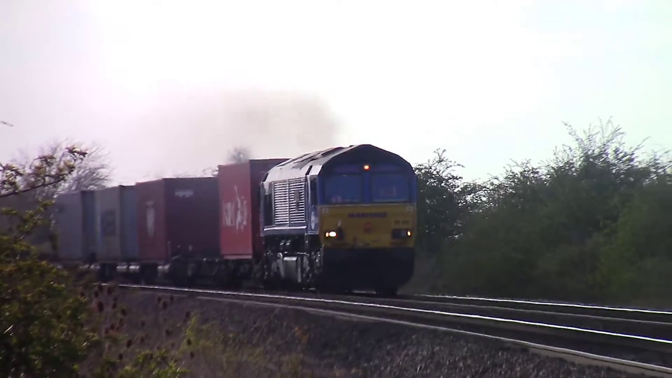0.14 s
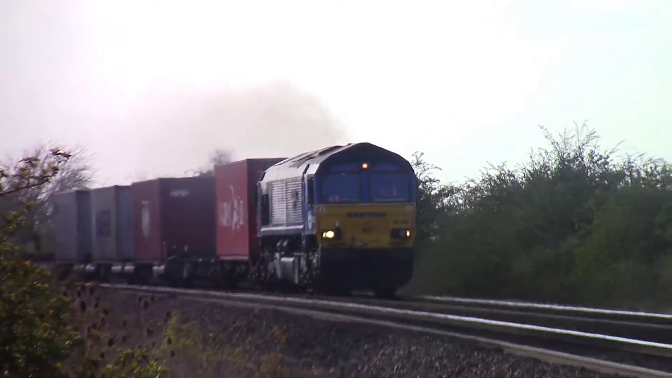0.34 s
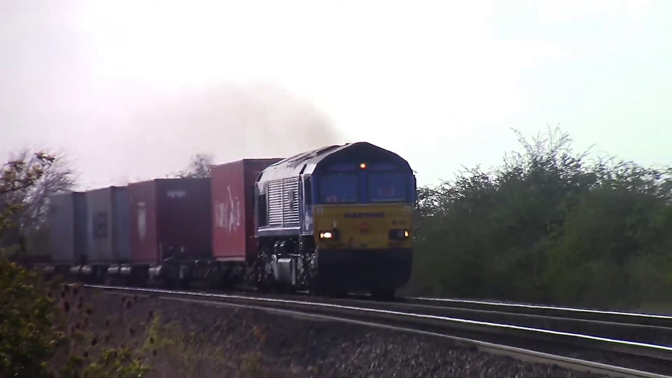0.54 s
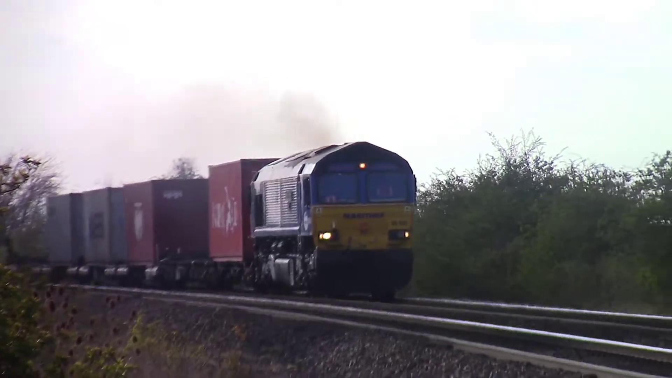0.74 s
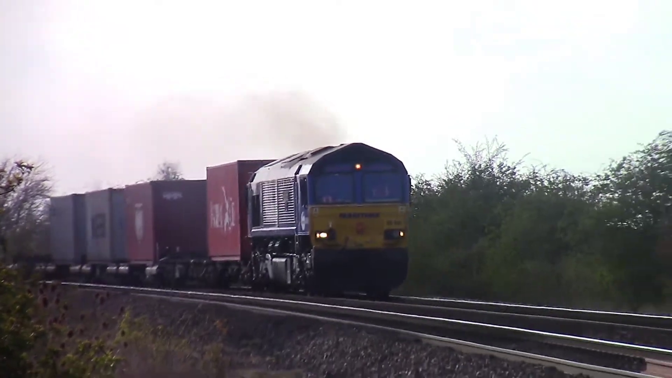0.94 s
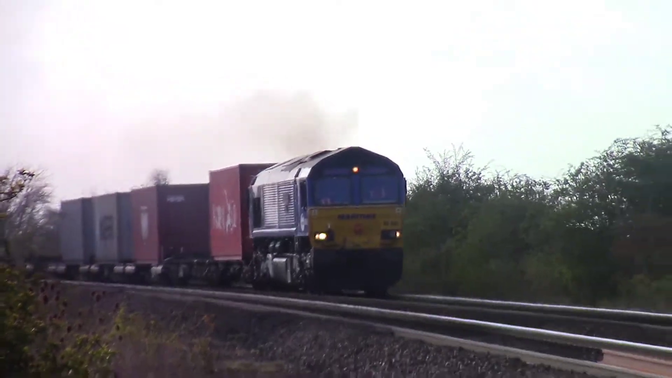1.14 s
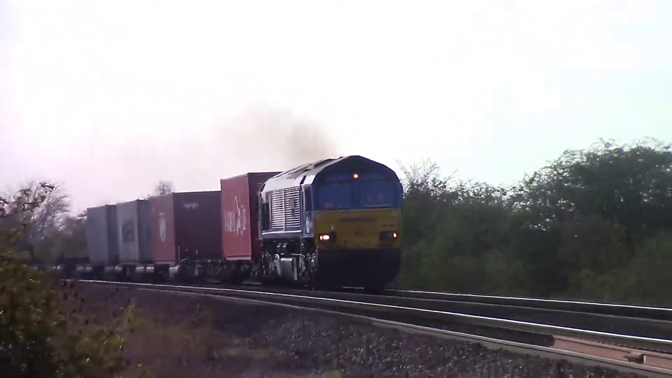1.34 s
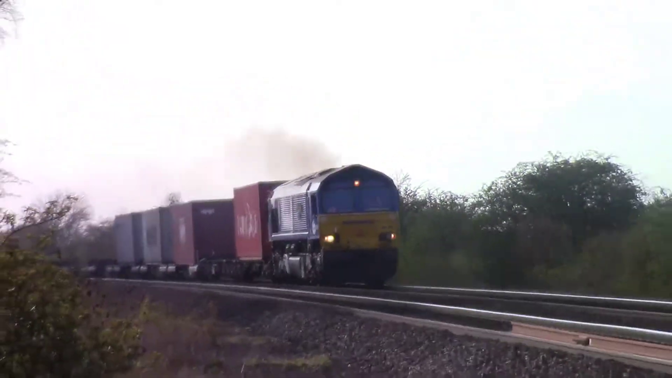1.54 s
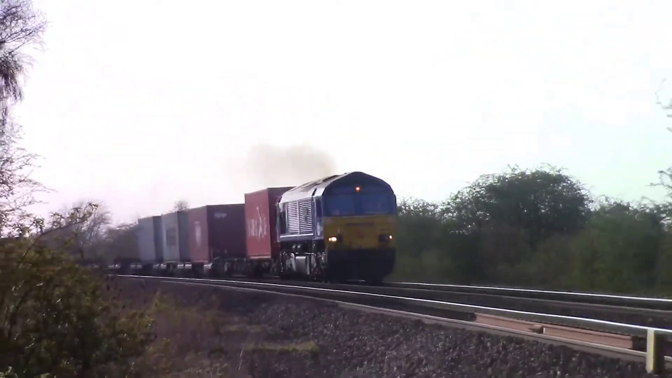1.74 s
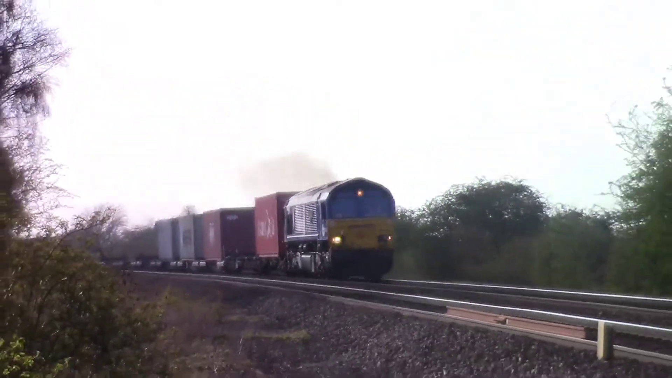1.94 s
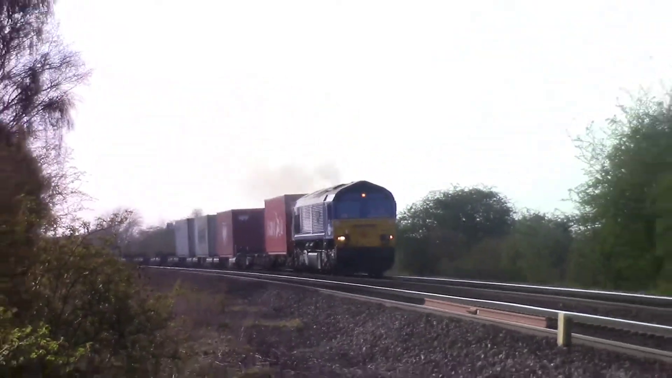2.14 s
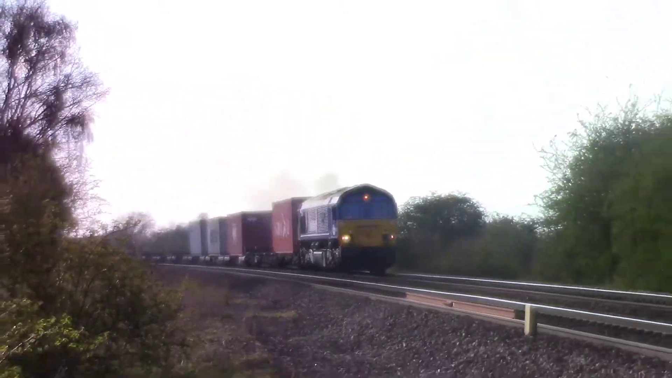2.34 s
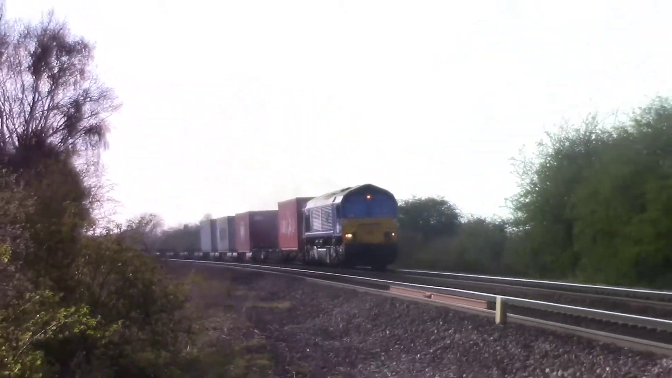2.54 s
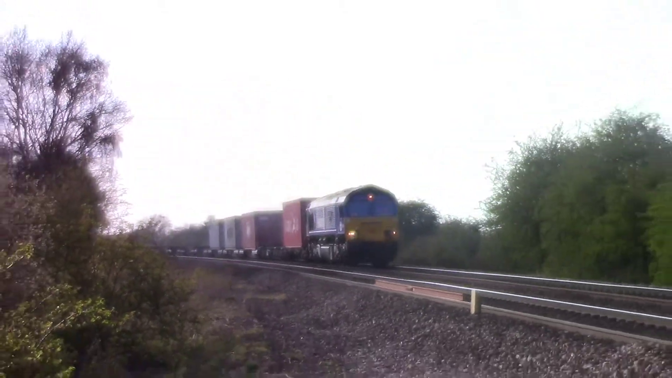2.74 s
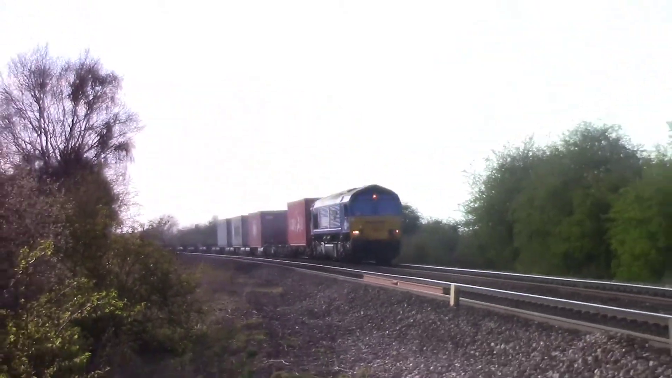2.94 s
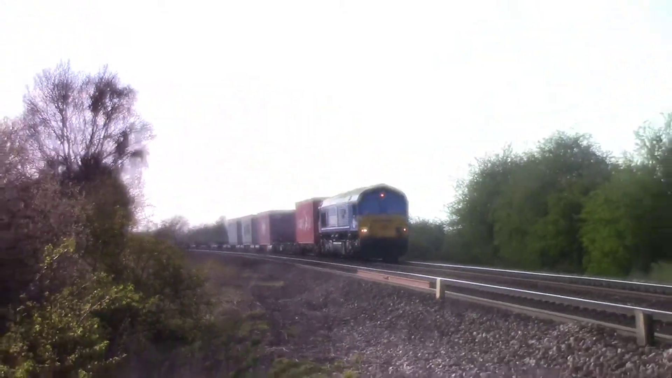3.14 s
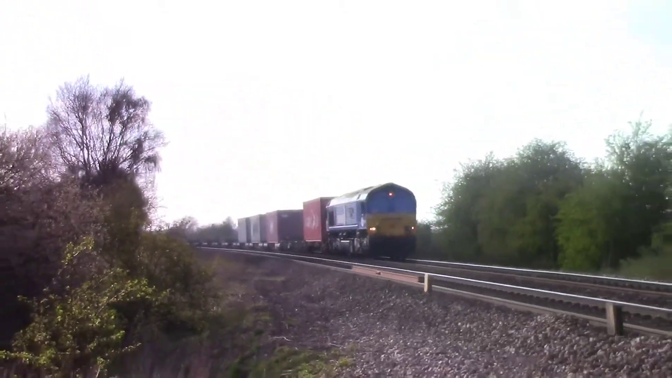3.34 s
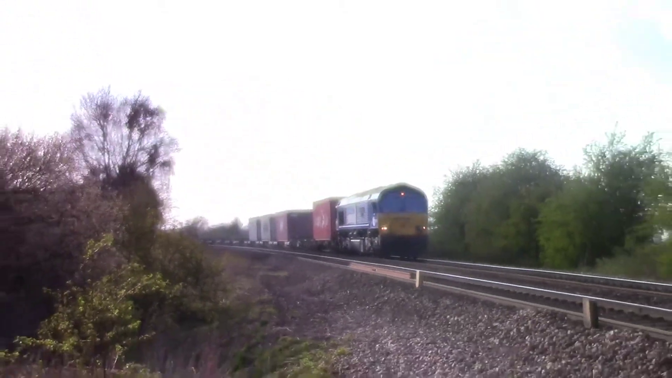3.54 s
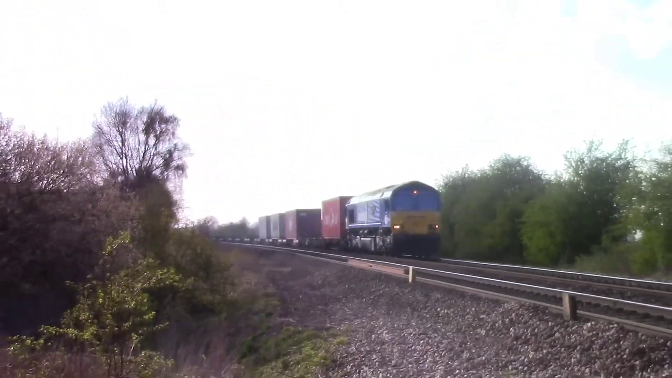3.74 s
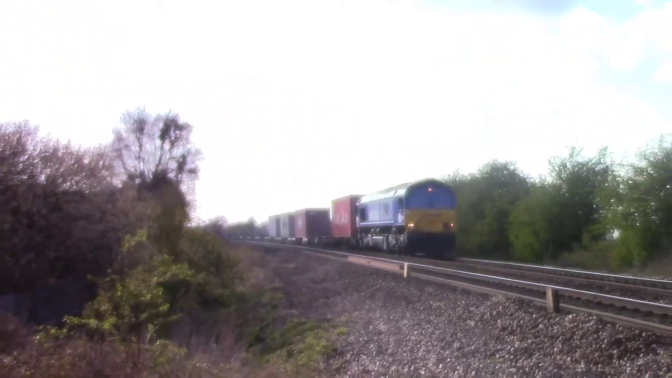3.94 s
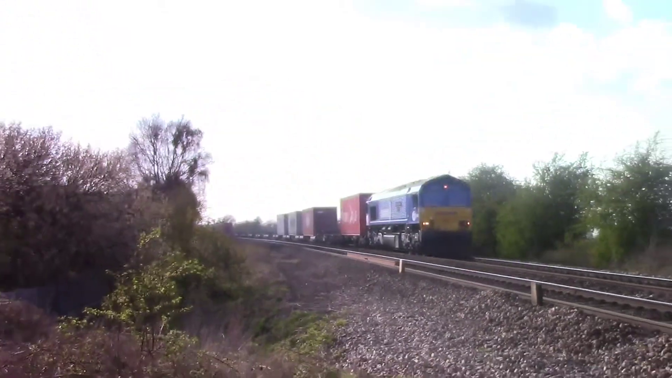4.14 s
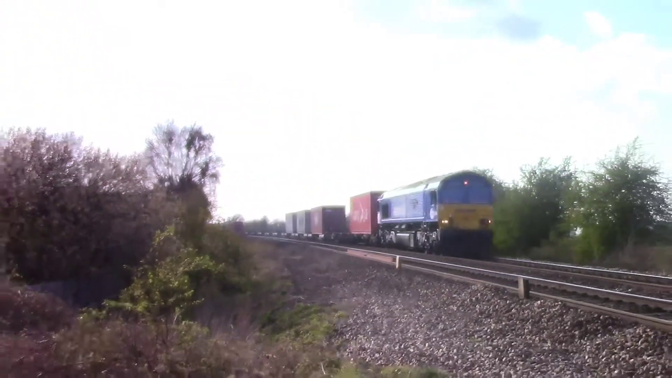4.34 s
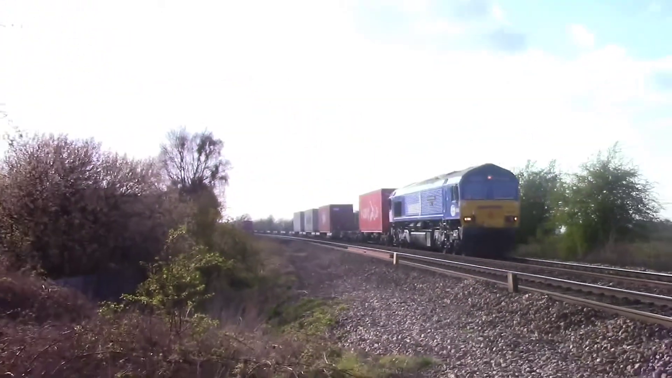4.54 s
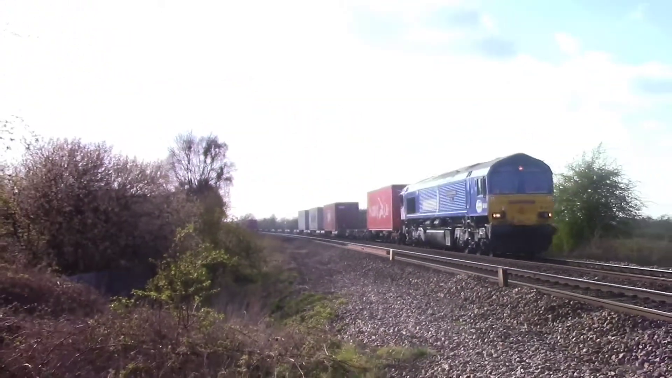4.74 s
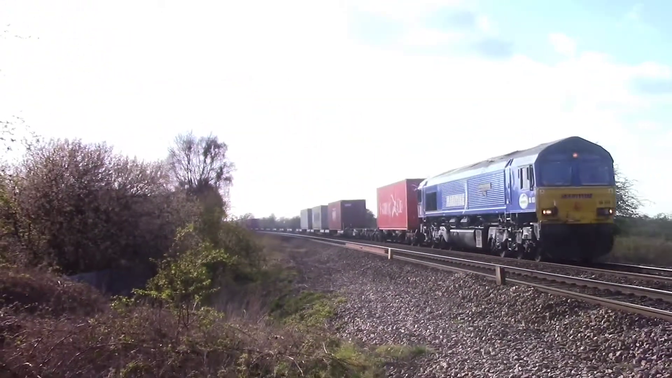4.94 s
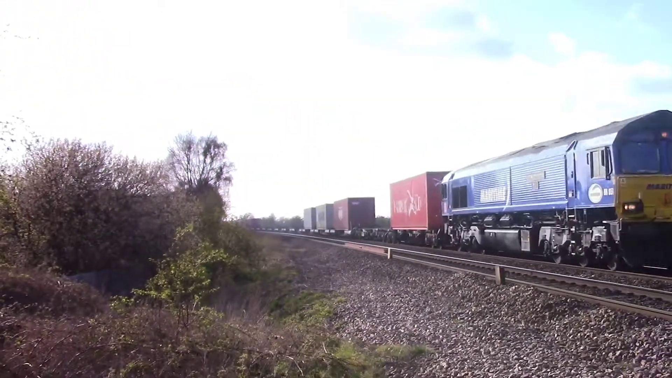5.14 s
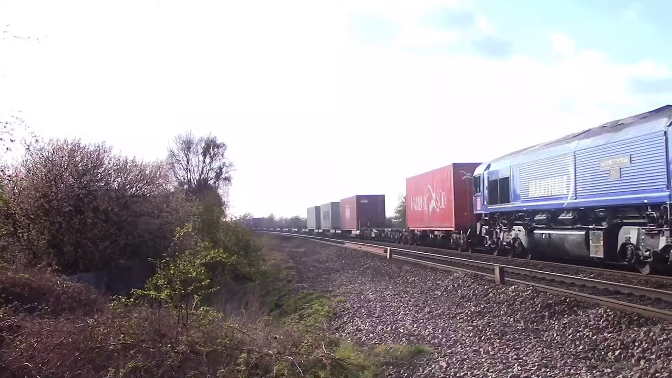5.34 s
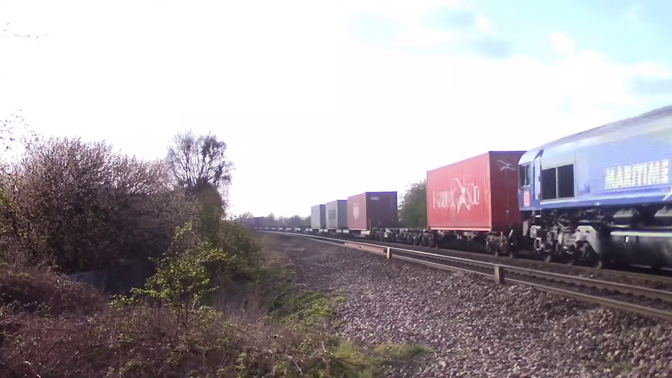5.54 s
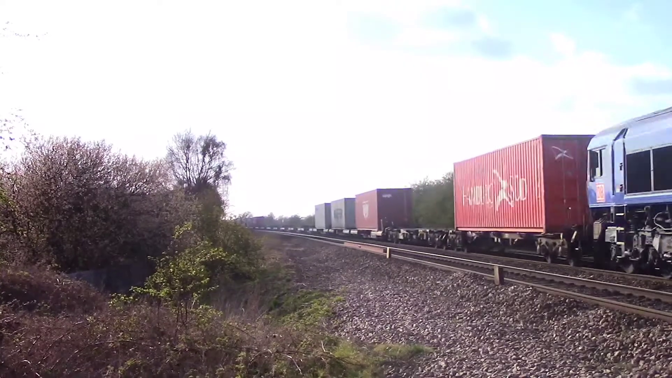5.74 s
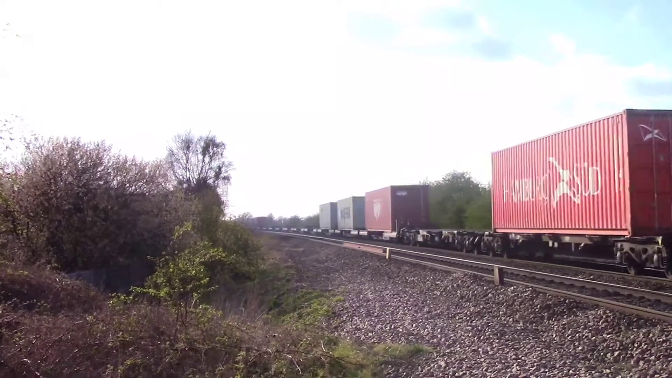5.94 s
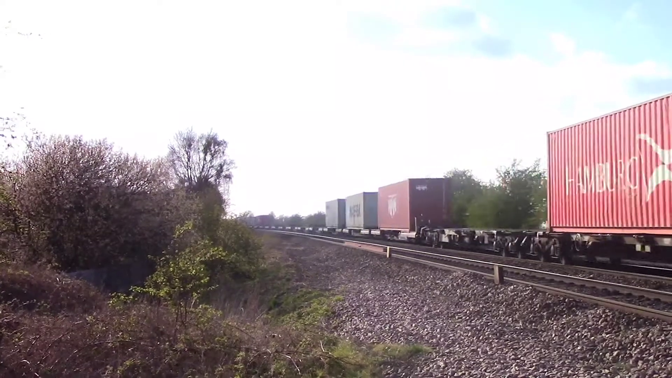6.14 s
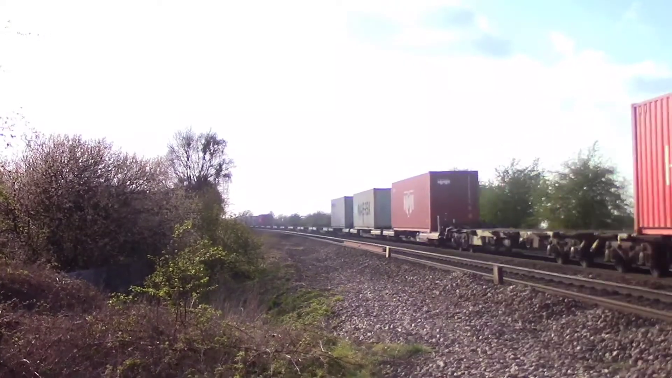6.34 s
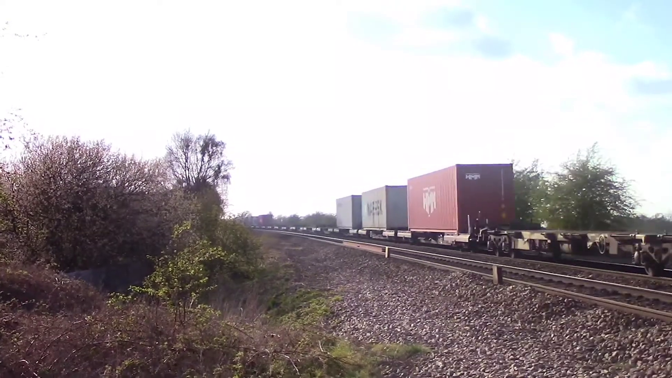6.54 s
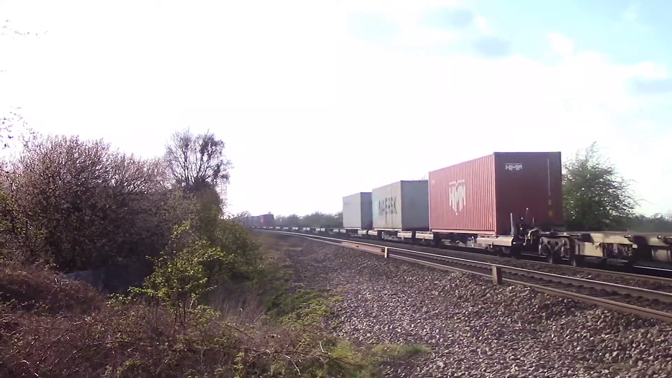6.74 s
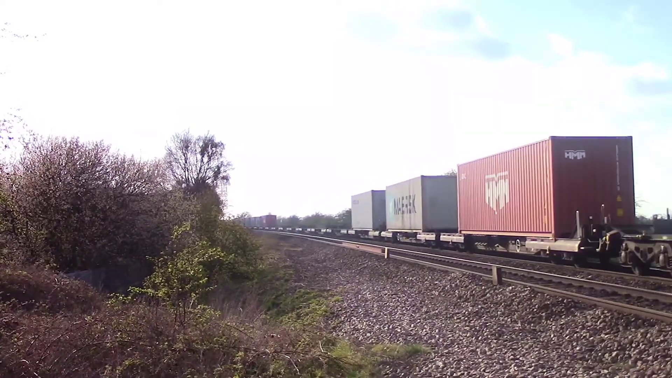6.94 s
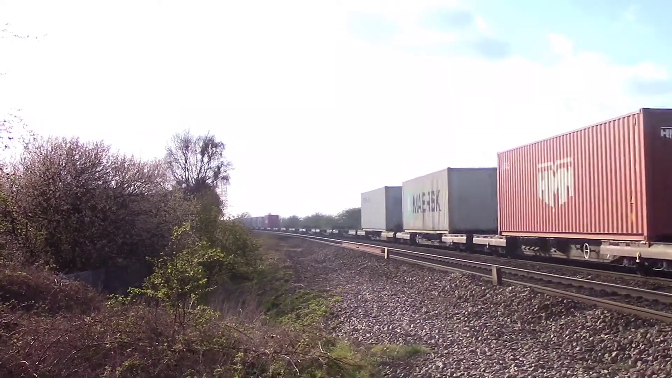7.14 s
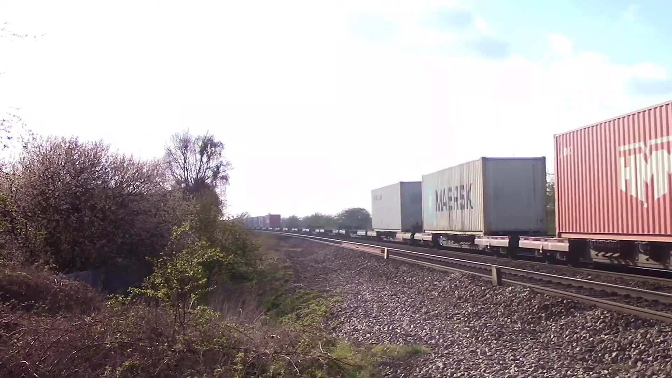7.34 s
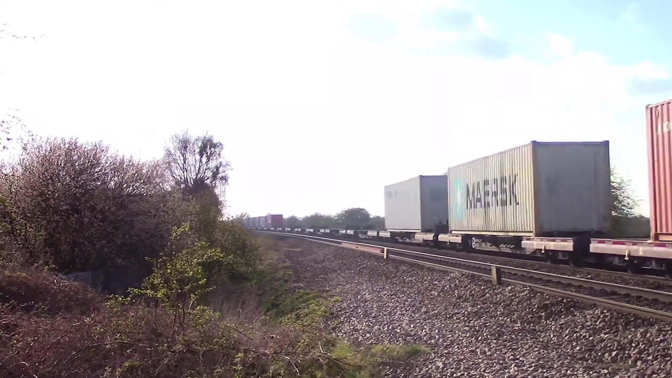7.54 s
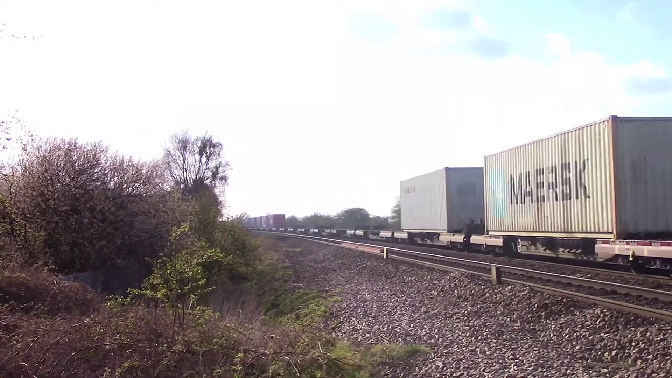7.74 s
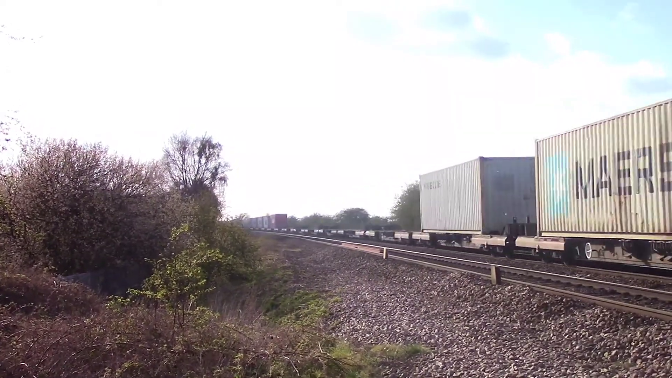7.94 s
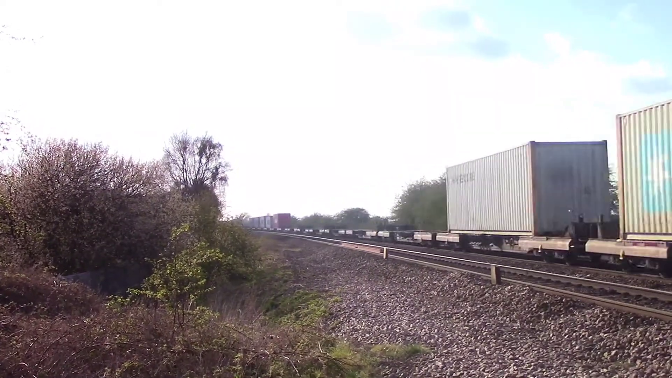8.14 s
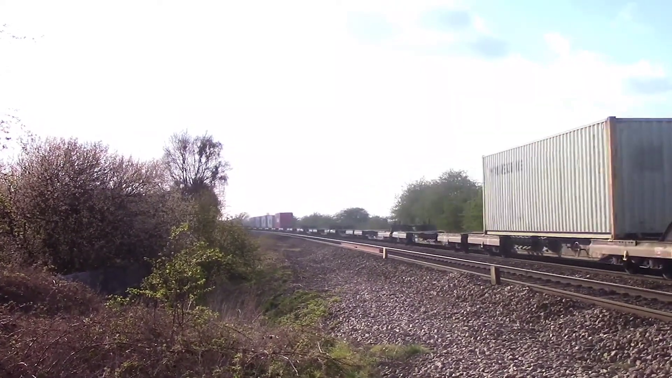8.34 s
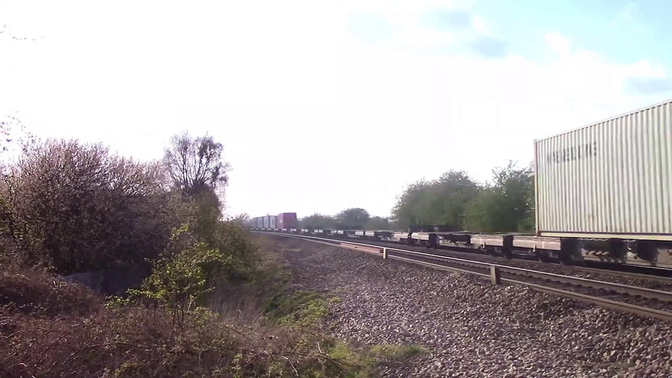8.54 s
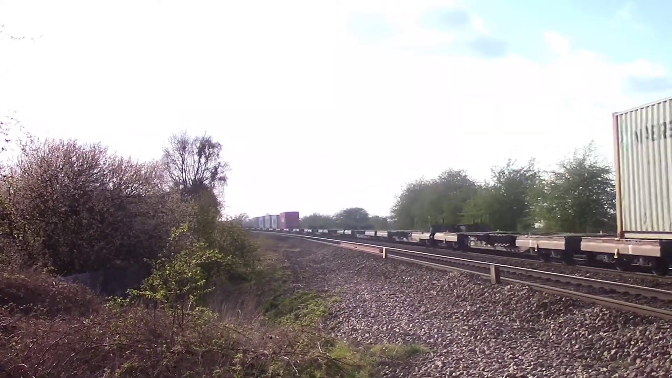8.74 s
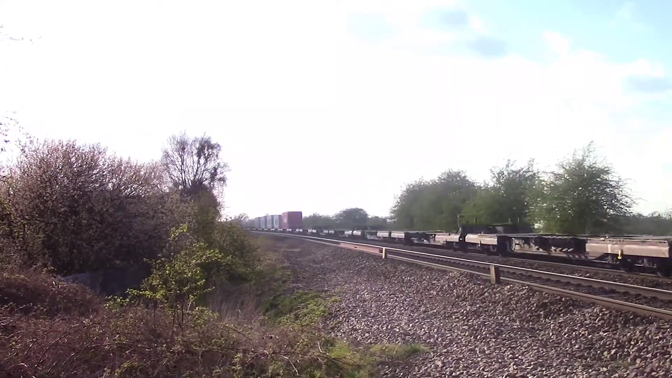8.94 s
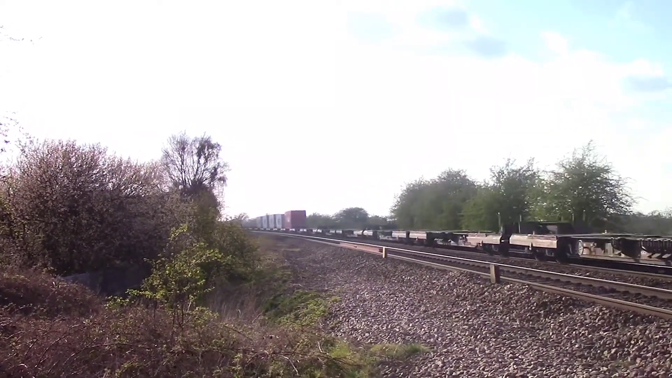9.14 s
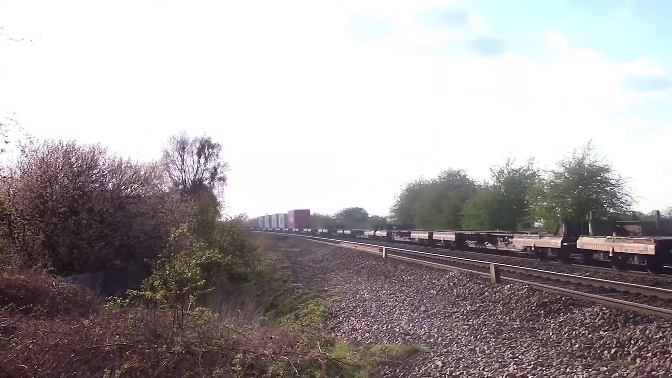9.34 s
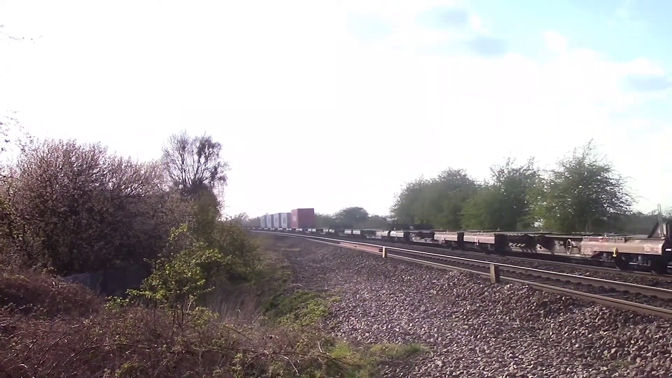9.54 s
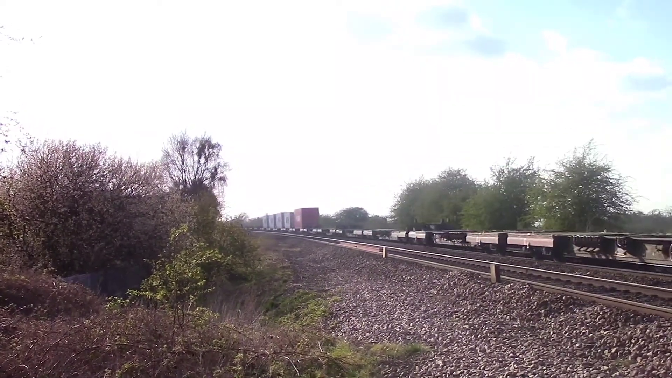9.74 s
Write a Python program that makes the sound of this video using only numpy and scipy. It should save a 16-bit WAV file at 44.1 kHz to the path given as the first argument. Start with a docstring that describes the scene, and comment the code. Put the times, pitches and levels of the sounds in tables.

```python
"""A diesel freight train passes at speed a few metres from a pair of microphones.
The engine drones in harmonics of its crankshaft rate and the locomotive's wheels sing as resonant modes,
dropping in pitch by the Doppler effect as each bogie goes by. Loaded, then empty container wagons roar past as
filtered noise that throbs with wheel turns and sleepers, amid squeals, knocks and booms.
A small bird trills in swept sine tones while the train is far off, over faint air noise with a thin whine."""
import sys
import numpy as np
from scipy import signal
from scipy.fft import rfft, irfft
from scipy.io import wavfile
from scipy.ndimage import uniform_filter1d, minimum_filter1d

SR = 44100
rng = np.random.default_rng(int(sys.argv[2]) if len(sys.argv) > 2 else 0)


def waveform_to_disk(signal):
    """Save audio, clipped to [-1, 1], as 16-bit WAV at the path in sys.argv[1]."""
    frames = np.transpose(np.atleast_2d(signal))
    scaled = np.clip(frames, -1, 1) * 32767
    samples = np.round(scaled).astype(np.int16)
    wavfile.write(sys.argv[1], SR, samples)


N = 436590
T = np.arange(N) / SR  # seconds
HZ = np.maximum(np.arange(N // 2 + 1) * SR / N, 1)  # spectrum bins

SPEED, TRACK_M, SOUND_SPEED = 30.0, 9.0, 343.0  # m/s, m, m/s
WHEEL_TURN_HZ, SLEEPER_HZ = 11.7, 43.14
CAB_ABREAST_S = 5.304


def undb(db):
    """Amplitude ratio: 20 dB is a factor of ten."""
    return 10 ** (np.asarray(db) / 20)


def unit(x):
    """Normalisation: scale to rms 1."""
    return x / np.sqrt(np.mean(np.abs(x) ** 2))


def contour(points):
    """Spectral envelope: (Hz, value) points joined on a log-frequency axis."""
    hz, value = np.transpose(points)
    return np.interp(np.log(HZ), np.log(hz), value)


def walk(rate):
    """Low-pass random modulation: a smooth wander with spread near 1, renewed `rate` times a second."""
    k = max(int(SR / rate), 2)
    steps = np.repeat(rng.standard_normal(N // k + 1), k)
    return 1.2 * uniform_filter1d(steps, k)[:N]


def swell(s, length):
    """Gaussian envelope: a bell-shaped rise and fall around a moment."""
    return np.exp(-.5 * ((T - s) / length) ** 2)


def after(s):
    """Elapsed time: seconds gone by since a moment, 0 before it."""
    return np.maximum(T - s, 0)


def ramp(start_s, length_s):
    """Linear crossfade: 0 before the start, 1 once the length has passed."""
    return np.clip((T - start_s) / length_s, 0, 1)


def throb(hz, wander):
    """Amplitude modulation: a swell once a cycle; the axles in earshot drift in and out of step."""
    return np.sqrt(2) * np.cos(2 * np.pi * np.cumsum(hz * (1 + wander * walk(5))) / SR)


def resonance(hz, width, steady=0.32):
    """Randomly driven mode: a wider one wanders faster in phase; friction evens out its size."""
    slow = np.arange(0, N, 16)  # the swing is computed at every 16th sample
    pole = np.exp(-np.pi * width * 1.5 * slow[1] / SR)
    push = rng.standard_normal(len(slow)) + 1j * rng.standard_normal(len(slow))
    swing = signal.lfilter([1], [1, -2 * pole, pole ** 2], push)
    swing = unit(swing / np.abs(swing) ** min(steady, 1))
    in_phase = np.interp(T, slow / SR, swing.real)
    quadrature = np.interp(T, slow / SR, swing.imag)
    phase = 2 * np.pi * np.cumsum(hz * np.ones(N)) / SR
    return np.sqrt(2) * (in_phase * np.cos(phase) + quadrature * np.sin(phase))


def passing(pass_s):
    """Doppler effect: pitch factor and nearness (1 when abreast) of a point on the train."""
    along = SPEED * (T - pass_s)
    distance = np.hypot(along, TRACK_M)
    return 1 / (1 + SPEED / SOUND_SPEED * along / distance), TRACK_M / distance


def approach(level_s, doubling_db, db_per_m):
    """Spreading and ground loss: dB of an oncoming source, rising to 0 as it draws level."""
    distance = np.hypot(SPEED * np.maximum(level_s - T, 0), TRACK_M)
    return -doubling_db * np.log2(distance / TRACK_M) - db_per_m * (distance - TRACK_M)


# Level difference, left minus right, of a source abreast.
# Each row: frequency in Hz, difference in dB.
MIC_BALANCE = [(300, 0), (900, -.7), (2200, -1.4), (4000, -2.5), (6500, -4.8), (9500, -3), (13000, 0)]
# Phase lead of the left microphone for a source abreast. Each row: frequency in Hz, lead in radians.
MIC_PHASE = [(200, 0), (1300, -.18), (4000, -.12), (10000, 0)]


def abreast(x, start_s=5.1, end_s=5.561):
    """Shadowing: with the train to the right, the camera body shades the left capsule from its treble."""
    half = np.array([[.5], [-.5]])
    gain = undb(half * contour(MIC_BALANCE))
    turn = np.exp(1j * half * contour(MIC_PHASE))
    shaded = irfft(rfft(x) * gain * turn, N)
    return x + ramp(start_s, end_s - start_s) * (shaded - x)


# Colour of the steady background, with a peak for the whine. Each row: frequency in Hz, relative level in dB.
AIR = [(30, 12), (3000, 8.5), (6200, -14), (6550, 3), (6720, 16.5), (6950, 3), (7600, 1), (8500, -7),
       (12000, -6.5), (14300, 4), (15500, -4.5)]


def air(level_db=-60.5, side_share=0.68):
    """Stationary filtered noise: a faint background with a thin high whine, as mid and side."""
    noise = rfft(rng.standard_normal((2, N)))
    mid, side = unit(irfft(noise * undb(contour(AIR)), N)) * undb(level_db)
    return mid, side_share * side


# The bird's opening notes.
# Each row: start in seconds, length in seconds, start pitch in Hz, end pitch in Hz, level in dB.
BIRD_NOTES = [(.21, 0.04022, 5354, 5200, -65.5), (1.095, 0.02196, 5750, 5950, -61),
              (1.128, .022, 3950, 4700, -56.5), (1.243, .022, 4300, 5348, -56),
              (1.3, 0.01807, 3501, 3989, -56), (1.447, 0.048, 5060, 5190, -55.5),
              (1.5, .03, 5150, 5200, -63), (1.6, 0.024, 3500, 4650, -53), (1.625, 0.024, 4900, 6104, -50)]
TRILL_S, TRILL_STEP_S, TRILL_DB = 1.68, .0637, -50


def bird(count=10, fade_db=.8, scatter_db=1.1, flatten_hz=18):
    """Frequency sweeps: slurred notes, then a trill of rises and steep falls that dies away."""
    notes = list(BIRD_NOTES)
    for k, (up, down) in enumerate(scatter_db * rng.standard_normal((count, 2))):
        s, db = TRILL_S + k * TRILL_STEP_S, TRILL_DB - fade_db * k
        notes.append((s, .017, 4550, 5300 - flatten_hz * k, db + up))
        notes.append((s + .015, .018, 4600, 3250, db + .3 + down))
    out = np.zeros(N)
    for s, length, start_hz, end_hz, db in notes:
        n, i = int(length * SR), int(s * SR)
        envelope = np.sin(np.linspace(0, np.pi, n))
        phase = 2 * np.pi * np.cumsum(np.linspace(start_hz, end_hz, n)) / SR
        out[i:i + n] += undb(db) * envelope * np.sin(phase)
    return out


# Brushes of wheel flanges against the rail. Each row: centre in seconds, half length in seconds, level in dB.
SCUFFS = [(9.3, .014, -35), (9.397, .014, -39), (9.458, 0.022, -39), (9.63, 0.02, -38.5),
          (9.685, 0.011, -37), (9.77, 0.014, -36), (9.87, .02, -38.5)]


def scuffs(lo_hz=5200, hi_hz=9300):
    """Sliding friction: flanges of the empty wagons brush the rail in short bursts of band-passed noise."""
    band = signal.butter(3, [lo_hz, hi_hz], "band", fs=SR, output="sos")
    hiss = unit(signal.sosfilt(band, rng.standard_normal(N)))
    return hiss * sum(undb(db) * swell(s, length) for s, length, db in SCUFFS)


# Blows of worn wheels on the rail.
# Each row: start in seconds, ring pitch in Hz, level in dB before the blow's envelope.
KNOCKS = [(6.994, 800, -12), (7.08, 900, -13), (7.145, 860, -15.5), (7.233, 900, -10.5),
          (7.392, 780, -13.5), (7.51, 950, -14), (7.665, 1050, -19), (8.126, 684, -9.5), (8.57, 498, -12),
          (9.07, 546, -10.5), (9.3, 540, -12.5)]


def wheel_knocks(decay_s=0.015, lowest_hz=150, ring_width_hz=200, thud_hz=330, thud_db=-6):
    """Impact excitation: worn patches on the wagon wheels knock the rail, at first about once a turn."""
    out = 0
    for s, hz, db in KNOCKS:
        # each blow builds up as the patch meets the rail, then dies away
        blow = 2 * (np.exp(-after(s) / decay_s) - np.exp(-4 * after(s) / decay_s))
        ring = resonance(hz, ring_width_hz, steady=0.7)
        thud = undb(thud_db) * resonance(thud_hz, 160)
        out = out + undb(db) * blow * (ring + thud)
    return signal.sosfilt(signal.butter(4, lowest_hz, "high", fs=SR, output="sos"), out)


def bogie(modes, pass_s, beam, drift=.0025, waver_db=1.06):
    """Modal radiation: rail roughness rings wheel modes, beamed ahead or aside, wavering as contact shifts.

    Returns the sound and its power."""
    doppler, near = passing(pass_s)
    side_on = np.minimum(near / beam, 1)
    pitch = doppler * (1 + drift * walk(6))
    sound, power = 0, 0
    for hz, width, ahead_db, side_db in modes:
        gain = undb(ahead_db + (side_db - ahead_db) * side_on + waver_db * walk(7))
        sound = sound + gain * resonance(hz * pitch, width, steady=0.52)
        power = power + gain ** 2
    return near * sound, near ** 2 * power


# Wagon bogies. Each row: closest approach in seconds, relative level in dB.
WAGON_BOGIES = [(6.949, -24), (7.201, -27), (7.7, -31), (8.3, -35.5), (8.949, -39), (9.6, -41), (10.2, -26)]
# Wagon wheel modes at rest.
# Each row: pitch in Hz, nominal width in Hz, head-on level in dB, side-on level in dB.
WAGON_WHEEL = [(1990, 30, -7, -9), (2130, 53, -6, -8), (2726, 39, -10, -7.5), (3240, 56, -19, -14),
               (3600, 105.5, -17, -12.5), (4480, 50, -22, -16.5)]


def wagon_wheels(enter_s=6.48, rise_s=0.62):
    """Doppler-shifted modes: each wagon bogie rings as it sweeps past."""
    rings = 0
    for pass_s, db in WAGON_BOGIES:
        sound, _ = bogie(WAGON_WHEEL, pass_s, beam=0.47)
        rings = rings + undb(db) * sound
    return ramp(enter_s, rise_s) * rings


# Hums, booms, thumps and lingering wheel rings at a steady pitch.
# Each row: centre in seconds, pitch in Hz, nominal width in Hz, half length in seconds, level in dB.
BOOMS = [(4.5, 539.5, 98, 0.65, -34), (5.33, 128, 10, 0.075, -23.5), (5.38, 83.7, 10, .07, -28),
         (6.107, 286, 22, 0.09, -15.5), (6.2, 87.7, 10, .06, -31), (6.25, 391, 87, 0.25, -21),
         (7.14, 305, 9.4, 0.047, -14), (7.2, 145.6, 30, 0.037, -26.5), (7.87, 44.9, 14, .167, -41.5),
         (7.7, 2518, 70, 0.38, -32.5), (7.8, 1890, 79, .45, -30), (8.46, 159.6, 25, 0.021, -23.5),
         (8.715, 2610, 104, .035, -25.5), (9.5, 390.4, 27, .32, -17), (9.694, 2570, 84, 0.12, -27.5),
         (9.76, 185, 62, 0.093, -20.5)]


def booms_and_rings():
    """Brief resonances: low hums, booms and thumps, and higher wheel rings, each swelling for a moment."""
    return sum(undb(db) * swell(s, length) * resonance(hz, width, steady=0.56)
               for s, hz, width, length, db in BOOMS)


# Squeals, one list each for the locomotive's front and rear bogies and the first wagon bogie.
# Each row: centre in seconds, pitch then in Hz, nominal width in Hz, half length in seconds, level in dB.
SQUEALS = [
    [(5.0, 2620, 30, 0.27, -37), (5.39, 3490, 43, .014, -26), (5.42, 3505, 35, .15, -32),
     (5.435, 2940, 45, .022, -21), (5.47, 2610, 28, .13, -23), (5.485, 3510, 70, .016, -24.5),
     (5.55, 2930, 45, .03, -27), (5.65, 2535, 33, .025, -20.5), (5.73, 848, 9, 0.12, -15),
     (5.751, 7590, 80, .0035, -29.5), (5.765, 7680, 160, 0.0044, -34), (5.96, 2455, 40, .05, -22.5),
     (6.21, 745, 11.4, 0.1, -20.5)],
    [(6.1, 826, 12, 0.23, -21.5), (6.18, 2514, 35, .04, -21), (6.43, 2415, 55, 0.058, -15.5),
     (6.54, 2355, 45, .014, -14), (6.605, 2320, 36, 0.018, -17), (6.675, 2290, 25, 0.021, -23),
     (6.73, 3385, 25, .035, -36)],
    [(6.88, 2890, 25, .04, -30), (7.015, 4530, 50, .015, -34), (7.08, 4260, 50, .02, -36),
     (7.137, 4940, 50, .008, -35), (7.157, 4540, 50, .012, -34), (7.175, 1990, 60, 0.017, -18),
     (7.2, 3400, 110, .03, -31), (7.227, 6420, 199.7, .004, -32), (7.275, 2635, 28, 0.064, -23),
     (7.31, 1950, 45, .08, -23), (7.323, 3330, 43.2, 0.014, -19.5), (7.33, 4030, 37.8, .016, -28.5),
     (7.39, 3290, 50, .04, -33), (7.43, 4950, 40, .011, -35), (7.5, 2520, 35, .06, -30),
     (7.69, 2000, 60, .025, -24.5)],
]


def squeals(flutter_db=1.5):
    """Stick-slip: three bogies squeal in broken bursts, falling in pitch by the Doppler effect."""
    out = 0
    passes = (LOCO_BOGIES[0][0], LOCO_BOGIES[1][0], WAGON_BOGIES[0][0])
    for pass_s, bursts in zip(passes, SQUEALS):
        doppler, _ = passing(pass_s)
        for s, hz, width, length, db in bursts:
            grip = undb(db + flutter_db * walk(45))
            pitch = hz * doppler / np.interp(s, T, doppler)
            out = out + grip * swell(s, length) * resonance(pitch, width, steady=0.8)
    return out


# Exhaust lines. Each row: multiple of the crankshaft rate, relative level from afar in dB, and close by in dB.
EXHAUST = [(3, -2, -23), (5, -14, -10), (6, -6, -14), (7, -12, -7), (8, 3.5, 4), (9, 6, -3), (11, -1, -11),
           (16, -17, 3), (20, -17, 3), (26, -16, 0.5)]
EXHAUST_BEAM = 0.44  # nearness from which the close levels hold
CRANK_HZ, ENGINE_PASS_S = 15.15, 5.95
DRONE_DB, DRONE_DOUBLING_DB, DRONE_DB_PER_M = -30.5, 4, 0.18  # gain, losses with distance
DRONE_MASKED_S, DRONE_FADE_DB_PER_S = 5.93, 28


def exhaust(waver_db=1.2):
    """Harmonic series: a low hum from afar, higher lines close by, masked by the wagons once past."""
    doppler, near = passing(ENGINE_PASS_S)
    turn = 2 * np.pi * np.cumsum(CRANK_HZ * doppler * (1 + 0.00348 * walk(7.9))) / SR
    close = np.minimum(near / EXHAUST_BEAM, 1)
    drone = 0
    for k, far_db, close_db in EXHAUST:
        line_db = far_db + (close_db - far_db) * close + waver_db * walk(6)
        drone = drone + undb(line_db) * np.sin(round(k) * turn + rng.uniform(0, 2 * np.pi))
    drone_db = DRONE_DB + approach(CAB_ABREAST_S, DRONE_DOUBLING_DB, DRONE_DB_PER_M)
    return drone * undb(drone_db - DRONE_FADE_DB_PER_S * after(DRONE_MASKED_S))


# Locomotive bogies. Each row: closest approach in seconds, relative level in dB.
LOCO_BOGIES = [(5.96, -1.5), (6.48, 0.5)]
# Locomotive wheel modes at rest.
# Each row: pitch in Hz, nominal width in Hz, head-on level in dB, side-on level in dB.
LOCO_WHEEL = [(765.5, 39, -6.5, -8.5), (1415, 13, -9.5, -26), (1461.2, 7.8, 0.5, -27),
              (1503, 10.3, 0, -9.5), (1502, 100, -2, -11), (1601, 33, -14, 5.5), (2200, 106, -7, -15.5),
              (2394, 51, -15.5, -3), (2690, 47, -30, -19), (3000, 60, -21, -34), (3208.5, 29.9, -28, -22)]
# Dips and swells of the song. Each row: centre in seconds, half length in seconds, change in dB.
SONG_WAVERS = [(.2, 0.3, -1), (1.556, 0.042, -3.5), (2.17, .13, -2.5), (2.38, .06, 3), (2.65, .12, -2),
               (3.513, .025, 0.5), (3.78, 0.055, -0.5), (4.856, 0.036, -5), (5.27, .04, -4.5)]
SONG_DB, SONG_DOUBLING_DB, SONG_DB_PER_M = -18, 3.0, 0.1  # level before the flare, losses with distance
# it flares as the cab draws level, holds, sags as the rear bogie leaves, and stops
SONG_ATTACK_S, SONG_FLARE_DB = 0.064, 4.5
SONG_SAG_S, SONG_SAG_DB_PER_S, SONG_STOP_S, SONG_STOP_DB_PER_S = 6.32, 16, 6.73, 150


def wheel_song(flutter_db=0.77):
    """Modal singing: the locomotive's two bogies ring, masked by the wagons once they are past."""
    song_db = SONG_DB + approach(CAB_ABREAST_S + SONG_ATTACK_S, SONG_DOUBLING_DB, SONG_DB_PER_M)
    song_db = song_db + SONG_FLARE_DB * np.minimum(after(CAB_ABREAST_S) / SONG_ATTACK_S, 1)
    song_db = song_db - SONG_SAG_DB_PER_S * after(SONG_SAG_S) - SONG_STOP_DB_PER_S * after(SONG_STOP_S)
    song_db = song_db + sum(db * swell(s, length) for s, length, db in SONG_WAVERS)
    song, power = 0, 0
    for pass_s, db in LOCO_BOGIES:
        sound, strength = bogie(LOCO_WHEEL, pass_s, beam=0.6)
        # the microphone looks up the line, so a bogie fades once it is behind
        heard = undb(db) / np.hypot(1, (after(pass_s) / 0.18) ** 2)
        song, power = song + heard * sound, power + heard ** 2 * strength
    beat_db = 0.84 * throb(SLEEPER_HZ, 0.03968) + 1.25 * throb(WHEEL_TURN_HZ, 0.12)
    return song / np.sqrt(power) * undb(song_db + beat_db + flutter_db * walk(35))


def rattle(per_s, decay_s):
    """Random impulses: loose fittings knock with a sudden rise and short decay; returns the envelope."""
    knocks = (rng.random(N) < per_s / SR) * rng.uniform(0.3, 1, N)
    return signal.lfilter([1], [1, -np.exp(-1 / (decay_s * SR))], knocks)


# Rolling-noise parts, in order: ground rumble, deck drone, rail roar, wheel ring, contact hiss.
# Each row: low edge in Hz, high edge in Hz, trim in dB, weight of the throb, weight of the flutter.
PARTS = [(36, 116, -1, 0, -0.5), (122.4, 510, 0, 0.8, 0.56), (517, 1520, -1.1, 0.9356, 0.86),
         (1554, 3810, 4, 1, 1.07), (3620, 15700, -0.5, 0.72, 0.9)]
# Loudness of the same parts. Each row: moment of drawing level in seconds, level before trim in dB beside
# the locomotive, beside loaded wagons and beside empty flats, loss in dB per doubling of distance,
# loss in dB per metre, share of a surge.
PART_LEVELS = [(5.44, -33.5, -42, -45, 6, -0.05, .6), (5.645, -16.5, -16.5, -10.5, 9.0, 0, 0.37),
               (5.58, -18, -18, -17.5, 4, 0.0952, 0.95), (5.48, -28, -31, -28.5, 3, 0.12, 0.94),
               (5.4, -34.5, -37, -38.5, 5, .108, 0.66)]
# Colour of the rolling noise from afar, beside the locomotive, beside loaded wagons and beside empty flats.
# Each row: frequency in Hz, relative level in dB; each part is levelled separately.
FAR = [(25, -23.5), (50, -10.5), (100, -14), (150, -6.5), (210, -11.5), (330, -9.5), (430, -12.5),
       (540, -1.5), (660, .3), (830, 2), (1200, -3), (1600, -1.5), (2000, -12), (2450, -7.5), (3500, -20),
       (6000, -31.5), (12000, -41.5)]
LOCO = [(25, -37), (75, -14), (140, -4.5), (260, 0.5), (395, -8.5), (480, -6.5), (650, -4.5), (1200, -13),
        (1600, -12.5), (2000, -20.5), (2700, -18), (4000, -25), (8000, -32.5), (9800, -39), (11500, -51.5),
        (15000, -56.5)]
WAGONS = [(25, -56), (50, -40), (85, -27), (150, -10), (220, -4), (380, 0), (560, -7), (850, -6),
          (1450, -15.5), (1950, -12.5), (2700, -20), (4000, -28.5), (7000, -36), (9500, -44.5),
          (11500, -56), (15000, -59.5)]
FLATS = [(25, -58), (50, -39), (85, -31), (150, -14.5), (270, -4.5), (390, 0), (520, -6), (900, -13),
         (1450, -20), (2000, -16.5), (2600, -23.5), (3100, -27.5), (4000, -33), (7000, -38), (9500, -48),
         (11500, -58.5), (15000, -64)]
# Unrelated share at the two microphones. Each row: frequency in Hz, side relative to mid in dB.
DIFFUSE = [(40, -26), (130, -36.5), (400, -29.5), (1000, -28), (2200, -15), (4000, -30.5), (8000, -17),
           (11500, -2), (15000, -13.5)]
# Surges as groups of axles roll by.
# Each row: centre in seconds, half length in seconds, rise in dB before each part's share, extra hiss in dB.
SURGES = [(5.46, 0.15, 2.5, 3.5), (6.2, 0.084, 2, .5), (7.205, .19, 5, 2.5), (7.714, 0.14, 3.5, -1),
          (8.28, 0.084, 1.3, 1.5), (8.73, 0.073, 4, -1.5), (9.035, 0.11, 3.6, -0.5), (9.35, 0.089, 3, 2),
          (9.73, 0.19, 1.5, 3.5)]


def rolling(rattle_share=0.53, hiss_above_hz=6000):
    """Roughness excitation: wheels shake ground, decks and rails, surging with axles; mid and side."""
    arrived, wagons, flats = ramp(3.2, 2.16), ramp(5.9, 1.02), ramp(7.7, 1.43)
    stages = [(FAR, 1 - arrived), (LOCO, arrived * (1 - wagons)),
              (WAGONS, wagons * (1 - flats)), (FLATS, flats)]
    beat = throb(WHEEL_TURN_HZ, 0.1) * 0.67 + throb(SLEEPER_HZ, 0.05) * 0.62
    knocks = 1 + rattle_share * arrived * rattle(per_s=22, decay_s=0.013)
    knocks = knocks / uniform_filter1d(knocks, SR // 2)  # keeps the local mean level
    surge_db, hiss_db = sum(np.outer([db, extra_db], swell(s, length)) for s, length, db, extra_db in SURGES)
    spread = np.array([np.ones(len(HZ)), undb(contour(DIFFUSE))])
    noises = [rfft(rng.standard_normal((2, N))) * spread * undb(contour(colour)) for colour, _ in stages]
    out = 0
    for (lo_hz, hi_hz, trim_db, throb_weight, flutter_weight), levels in zip(PARTS, PART_LEVELS):
        level_s, loco_db, loaded_db, empty_db, doubling_db, db_per_m, surge_share = levels
        wagon_db = loaded_db * (1 - flats) + empty_db * flats
        db = loco_db * (1 - wagons) + wagons * wagon_db
        db = db + approach(level_s, doubling_db, db_per_m) + surge_share * surge_db
        db = db + (hi_hz > hiss_above_hz) * hiss_db
        band = 1 / (1 + (lo_hz / HZ) ** 12) / (1 + (HZ / hi_hz) ** 12)
        part = 0
        for noise, (_, share) in zip(noises, stages):
            x = irfft(noise * band, N)
            part = part + np.sqrt(share) * x / np.std(x[0])
        # knocks stand out most in the treble
        clatter = knocks ** min(hi_hz / hiss_above_hz, 1)
        modulation_db = throb_weight * beat + flutter_weight * walk(18)
        out = out + part * clatter * undb(db + trim_db + modulation_db)
    return out


def scene(song_right=0.076, bird_left=0.3526):
    """Superposition: train, bird and background add at a close pair of microphones."""
    sides = np.array([[1], [-1]])  # left, right
    air_mid, air_side = air()
    background = air_mid + sides * air_side
    roar_mid, roar_side = rolling()
    gear = wagon_wheels() + booms_and_rings() + squeals() + wheel_knocks() + scuffs()
    train = abreast(roar_mid + gear + sides * roar_side)
    train = train + exhaust() + wheel_song() * (1 - song_right * sides)
    return train + bird() * (1 + bird_left * sides) + background


LIMIT, LIMITER_S, TOP_HZ = .9, 0.0022, 15400  # peak, window, low-pass edge


def record(dry):
    """Peak limiting: a fast gain holds the loudest peaks below full scale, then the top is cut."""
    size = 2 * int(LIMITER_S * SR / 2) + 1
    needed = LIMIT / np.maximum(np.abs(dry).max(axis=0), LIMIT)
    gain = uniform_filter1d(minimum_filter1d(needed, size), size)
    low_pass = signal.ellip(10, .2, 80, TOP_HZ, fs=SR, output="sos")
    return signal.sosfilt(low_pass, dry * gain)


dry = scene()
out = record(dry)
waveform_to_disk(out)
```